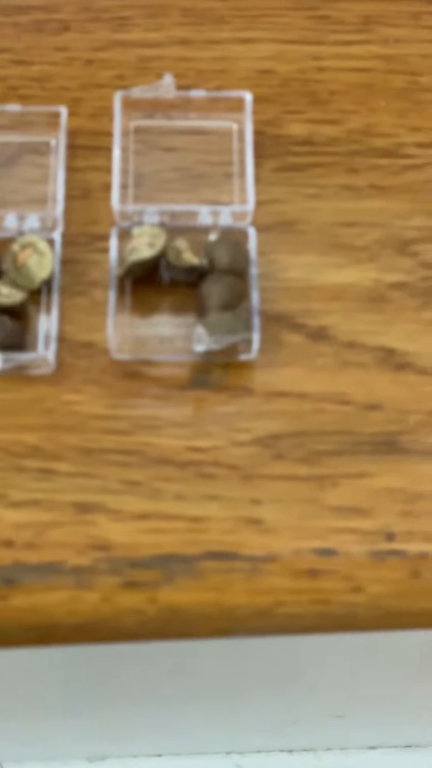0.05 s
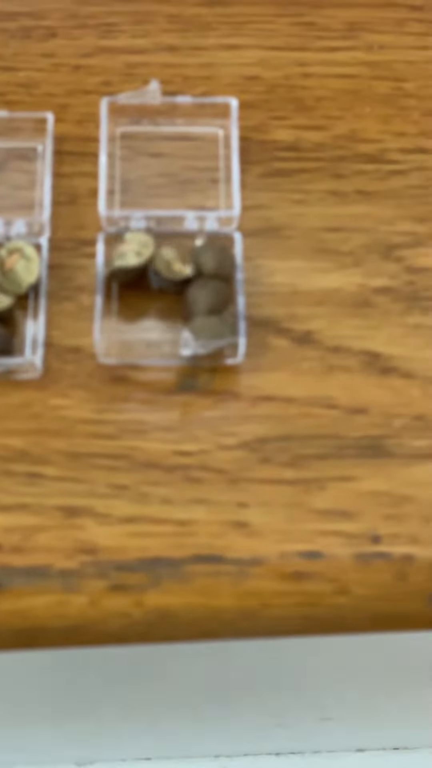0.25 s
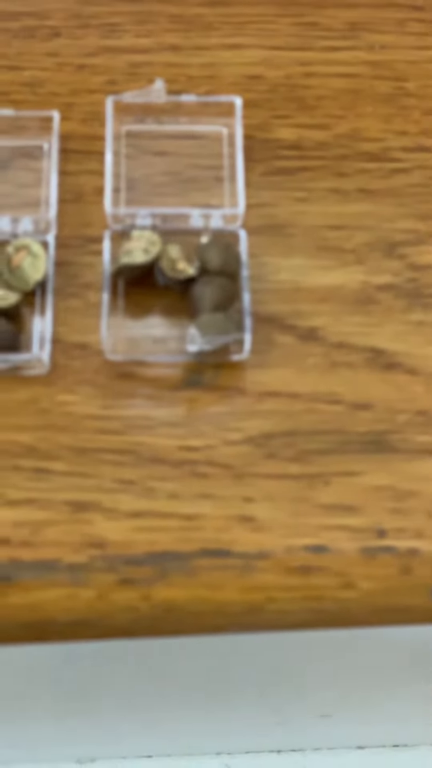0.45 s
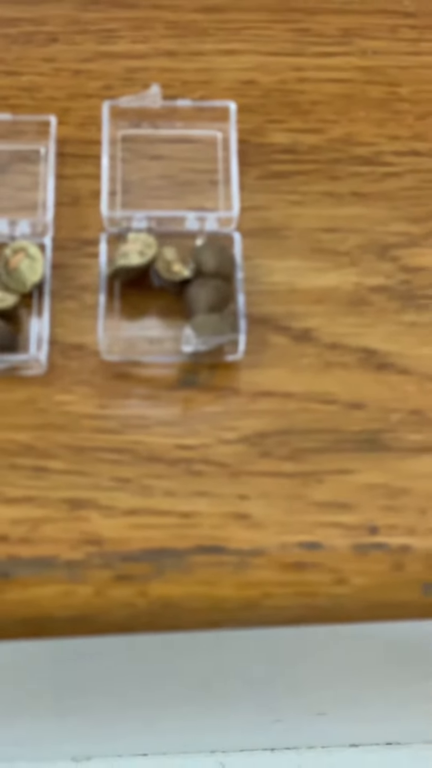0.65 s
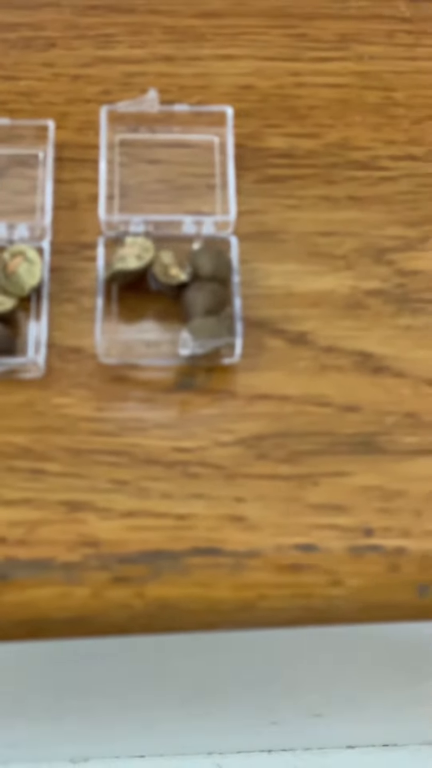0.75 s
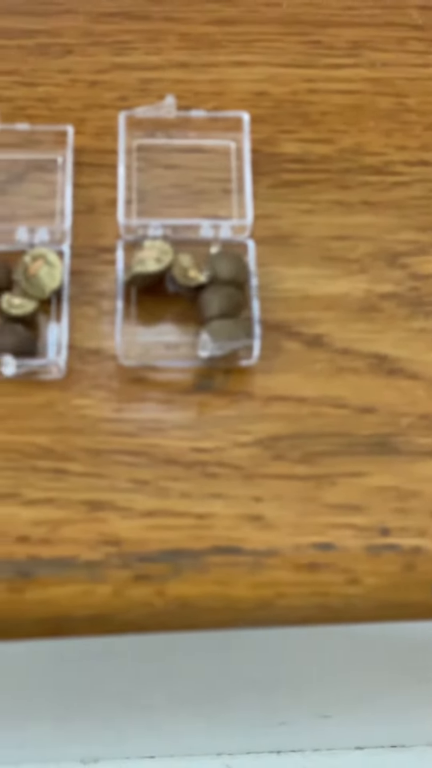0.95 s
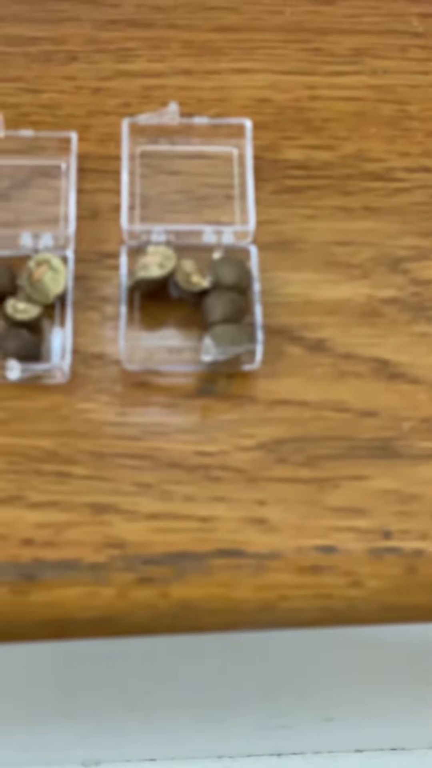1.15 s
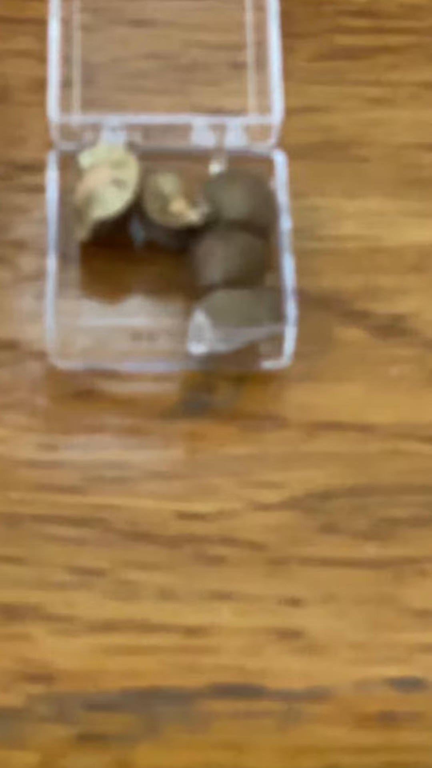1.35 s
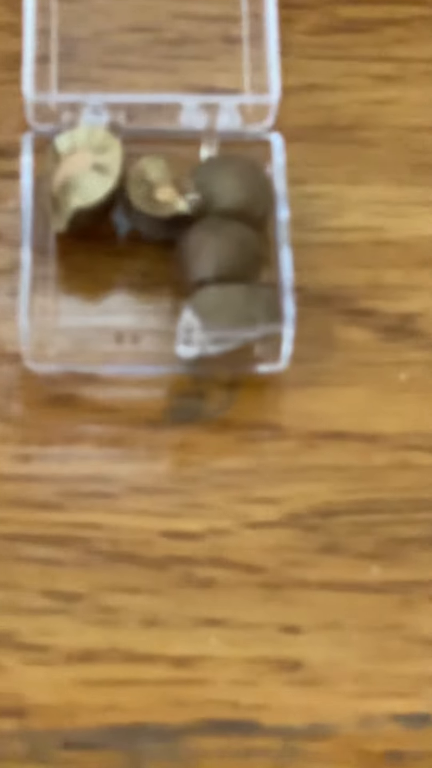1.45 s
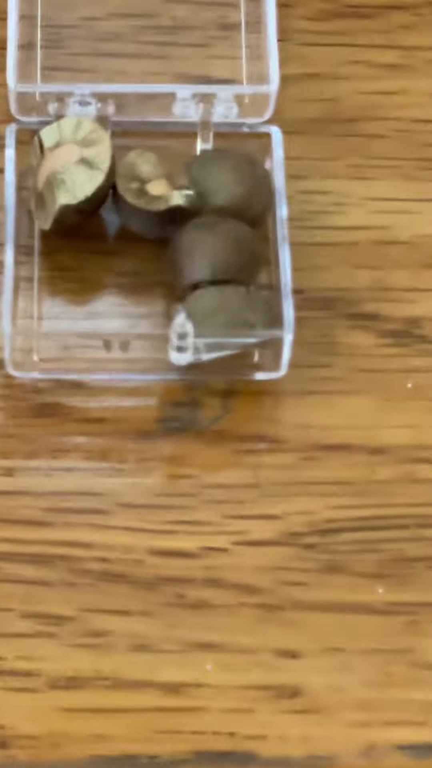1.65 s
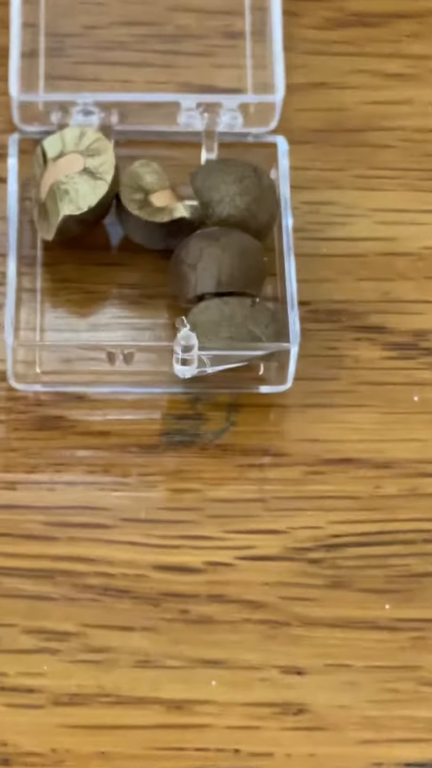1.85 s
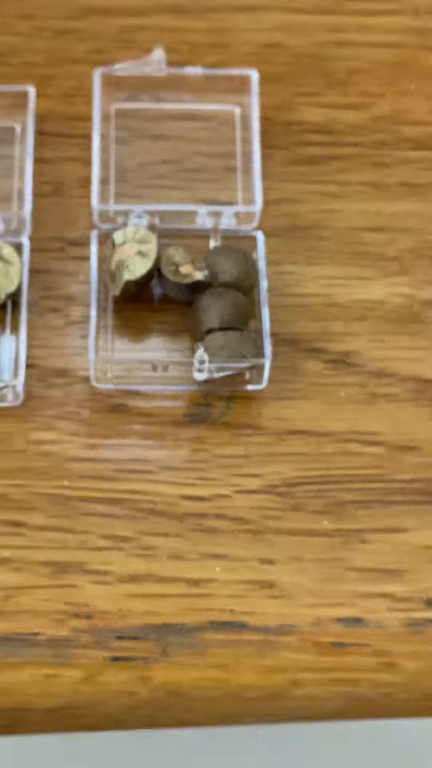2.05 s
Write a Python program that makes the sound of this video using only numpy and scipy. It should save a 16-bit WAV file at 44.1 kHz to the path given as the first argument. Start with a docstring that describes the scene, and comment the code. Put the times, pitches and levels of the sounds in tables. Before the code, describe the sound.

Small plastic cases click close by, with a bright, brittle, bouncing run at about 0.2 seconds. A faint knock sounds further off near 0.65 seconds. More clicks come around 0.9 seconds, then a soft tap on a wooden table at 1.05 and a last sharp cluster at 1.2. Faint taps and knocks continue until about 2 seconds, over low room rumble and a slight hum.

```python
"""A quiet room with a wooden table, where small hard plastic cases are handled. Each impact excites the
modes of a case: bright, brittle clicks in short bouncing runs. Soft taps ring the table near 700 Hz,
and a few softer knocks sound further off, over low rumble, a hum and a faint hiss.
Two close microphone ports hear nearly the same sound, with a phase gap that grows in the treble."""
import sys
import numpy as np
from scipy import signal
from scipy.fft import rfft, irfft
from scipy.io import wavfile

SR = 44100
rng = np.random.default_rng(int(sys.argv[2]) if len(sys.argv) > 2 else 0)


def persist_wave(psi):
    """Save psi, clipped to +-1, as 16-bit WAV."""
    counts = np.round(np.clip(psi, -1, 1) * 32767).astype(np.int16)
    wavfile.write(sys.argv[1], SR, np.atleast_2d(counts).T)


N = 92610
OPPOSITE = np.array([[1], [-1]])  # antiphase at the left and right ports


def amp(db):
    """Decibels as an amplitude ratio."""
    return 10 ** (np.asarray(db) / 20)


def unit(x):
    """Normalisation to rms 1."""
    return x / np.sqrt(np.mean(x ** 2) + 1e-20)


def decay(t, t60):
    """Exponential damping: 60 dB down after t60 seconds."""
    return amp(-60 * t / t60)


def envelope(rows):
    """Amplitude at every sample, interpolated in decibels."""
    return amp(np.interp(np.arange(N) / SR, *np.transpose(rows)))


def drift(rate):
    """Slow random modulation: low-passed noise with a spread near 1."""
    r = np.exp(-80 * np.pi * rate / SR)
    slow = signal.lfilter([1], [1, -2 * r, r * r], rng.standard_normal(N // 40 + 2002))[2000:]
    return np.interp(np.arange(N) / 40, np.arange(len(slow)), unit(slow))


def ring(x, hz, t60):
    """Damped resonator: a unit impulse starts a decaying sine of height 1."""
    r, w = decay(1 / SR, t60), 2 * np.pi * hz / SR
    return signal.lfilter([0, np.sin(w)], [1, -2 * r * np.cos(w), r * r], x + 1e-18)


def burst(grain, decay_s):
    """Noise transient of unit energy: a quick rise, then exponential decay."""
    t = np.arange(len(grain)) / SR
    shape = grain * np.exp(-t / decay_s) * t / (t + decay_s / 2)
    return shape / np.sqrt(np.sum(shape ** 2))


def absorb(x, cutoff_hz=13500):
    """Absorption: air and soft furnishings take the highest treble."""
    return signal.sosfilt(signal.butter(6, cutoff_hz, fs=SR, output="sos"), x)


def noise(spectrum, flicker_db):
    """Amplitude-modulated noise of rms 1: each half-octave band flickers on its own, the treble less."""
    hz, db = np.transpose(spectrum)
    f = np.arange(N // 2 + 1) * SR / N + 1
    shaped = rfft(rng.standard_normal(N)) * amp(np.interp(np.log(f), np.log(hz), db))
    half_octaves = 2 * np.log2(f / 20)
    bands = (irfft(shaped * np.clip(1 - abs(half_octaves - k), 0, 1) ** .5, N) for k in range(21))
    return unit(sum(band * amp(flicker_db * (1 - k / 24) * drift(6.0)) for k, band in enumerate(bands)))


def room_noise():
    """Partial coherence: a rumble common to both ports, plus weaker noise in antiphase."""
    # spectrum of the common noise: (frequency [Hz], relative density [dB])
    common = [(26, -35.5), (35, -7.5), (40, 0), (100, -1.5), (210, -10), (330, -20), (500, -30),
              (1100, -27.5), (1700, -40), (2600, -49.5), (4800, -55), (6200, -50.5), (8500, -57.5),
              (11500, -51), (14000, -64.5), (16000, -84)]
    # spectrum of the antiphase noise: (frequency [Hz], relative density [dB])
    antiphase = [(60, -5), (150, 9), (250, 12), (500, 12.5), (1200, 11.5), (2000, -22.5), (5000, -21),
                 (8000, -41.5), (14000, -50.5)]
    return amp(-53) * noise(common, flicker_db=5) + amp(-72) * noise(antiphase, flicker_db=8) * OPPOSITE


def hum(hz=177.8):
    """A pure tone under slow amplitude modulation: the level dips and recovers."""
    # course of the hum: (time [s], rms level [dB])
    levels = [(0.0, -58), (0.72, -75), (0.81, -57), (1.06, -61.5), (1.6, -59.5), (1.84, -80.5), (1.89, -65),
              (2.06, -59), (2.1, -83)]
    return envelope(levels) * np.sqrt(2) * np.sin(2 * np.pi * hz * np.arange(N) / SR)


def case_clicks():
    """Modal vibration: impacts ring the plastic. Returns the clicks and their first broad cracks."""
    # impacts: (time [s], level of each of six mode groups from low to high [dB], contact time [s])
    impacts = [(0.188, -55, -66, -61, -58.5, -61, -60.5, 0.0018),
               (0.2015, -58.5, -67, -67.5, -73, -66, -70.5, 0.0073),
               (0.2205, -45.5, -39, -49, -50, -51, -58.5, 0.0026),
               (0.2286, -28, -17.5, -23, -19, -10, -28, 0.0002),
               (0.2355, -39, -37, -44.5, -40, -35.5, -45.5, 0.00033),
               (0.2437, -34, -21, -39, -27.5, -34.5, -46, 0.0002),
               (0.2598, -45.5, -37, -42.5, -34.5, -40, -48.5, 0.00067),
               (0.287, -60.5, -47, -64, -52.5, -52, -70, 0.0002),
               (0.8516, -30.5, -31.5, -31, -31.5, -27, -29, 0.0002),
               (0.864, -35, -33, -42, -33.5, -47, -61, 0.0002),
               (0.877, -47.5, -55, -54, -58, -61.5, -59, 0.0018),
               (0.8878, -40, -28, -25.5, -21, -23, -30, 0.0002),
               (0.9172, -40.5, -25.5, -30, -45, -50, -38.5, 0.0002),
               (0.934, -53.5, -60, -49, -62, -59.5, -65.5, 0.0002),
               (0.943, -58.5, -64, -68, -54.5, -58.5, -61.5, 0.002),
               (0.9672, -51, -42, -54.5, -48.5, -51.5, -69, 0.00033),
               (1.1805, -50, -47, -52.5, -61, -51.5, -61.5, 0.00067),
               (1.1868, -29, -22.5, -25, -21, -9.5, -26.5, 0.0002),
               (1.1976, -47, -27.5, -29, -32, -34, -40.5, 0.0002),
               (1.2062, -34, -23, -29.5, -21.5, -28, -42, 0.0002),
               (1.234, -52, -56, -49.5, -55, -56, -64.5, 0.0002),
               (1.2455, -75, -62, -50, -55, -63, -66, 0.00033)]
    # modes of a case: (frequency [Hz], relative level [dB], t60 [s])
    modes = [(2926, -6, 0.0045), (3570, -3.5, 0.0033), (4248, -8, .016), (4674, -6, 0.0096),
             (5538, -8, 0.0093), (6077, 1, 0.0064), (6450, -5.5, 0.0096), (7736, -5, .025),
             (8406, -6, 0.012), (9200, -6, .015), (10850, -8, .015), (12600, -10, 0.018), (13200, -4, .011),
             (15000, -11.5, 0.0043)]
    # borders between the mode groups: (frequency [Hz])
    group_edges = [5100, 7000, 8700, 10000, 11500]
    gain_db, spread_db, detune_spread, rise_s = 2, 0.5, 0.013, .0003
    length, grains = 4410, 800  # samples
    t = np.arange(length) / SR
    onset = decay(t, t60=0.036)
    rise = 1 - np.exp(-(t / rise_s) ** 2)
    clicks, cracks = np.zeros((2, N + length))
    draws = rng.standard_normal((len(impacts), grains + 3 * len(modes)))
    for (s, *group_db, contact_s), draw in zip(impacts, draws):
        # a contact under half a millisecond is a clean blow, a longer one a scuff
        force = 2 * burst(draw[:grains], contact_s) if contact_s > .0005 else [1.]
        force = np.pad(force, (0, length))[:length]
        # each impact strikes every mode a little differently
        for (hz, mode_db, t60), (loud, detune, polarity) in zip(modes, draw[grains:].reshape(-1, 3)):
            level = amp(gain_db + group_db[np.searchsorted(group_edges, hz)] + mode_db + spread_db * loud)
            partial = np.sign(polarity) * level * rise * ring(force, hz * (1 + detune_spread * detune), t60)
            clicks[int(s * SR):][:length] += partial
            cracks[int(s * SR):][:length] += partial * onset
    low_cut = signal.butter(3, 1850, "high", fs=SR, output="sos")
    clicks, cracks = signal.sosfilt(low_cut, [clicks, cracks])
    # early reflections from close surfaces smear the ring, not alike on both sides
    reflections = [burst(grain, decay_s=.0025) for grain in rng.standard_normal((2, 1500))]
    common, apart = (signal.fftconvolve(clicks, response)[:N] for response in reflections)
    return clicks[:N] + amp(-10) * common + amp(-12) * apart * OPPOSITE, cracks[:N]


def far_knocks():
    """Forced resonance: a grainy scuff drives one heavily damped mode, with a faint hissy tick."""
    # knocks: (time [s], scuff level [dB], frequency [Hz], t60 [s], tick level [dB])
    knocks = [(.190, -48, 2500, .004, -73), (.646, -45, 2100, 0.0044, -52.5),
              (0.648, -55, 1210, 0.0088, -89), (.762, -65, 5300, 0.0085, -80),
              (0.765, -49, 1300, 0.0016, -93.5), (0.828, -51, 990, 0.0055, -65),
              (1.058, -62.5, 2364, .004, -84.5), (1.882, -56, 1730, .018, -59),
              (1.882, -55, 1250, 0.016, -83), (2.026, -71, 4190, .012, -80.5)]
    length = 1600
    draws = rng.standard_normal((len(knocks), 2, length))
    out = np.zeros(N + length)
    for (s, db, hz, t60, tick_db), (scuff_grain, tick_grain) in zip(knocks, draws):
        scuff = 2 * amp(db) * ring(burst(scuff_grain, decay_s=0.009), hz, t60)
        tick = 10 * amp(tick_db) * np.gradient(burst(tick_grain, decay_s=.003))
        out[int(s * SR):][:length] += scuff + tick
    return absorb(out[:N])


def hiss(band_hz=(6900, 14400)):
    """Band-limited noise: a faint high hiss that swells once."""
    # course of the hiss: (time [s], rms level [dB])
    levels = [(0, -100), (.3, -100), (.42, -80.5), (.72, -95.5), (.8, -100), (2.1, -100)]
    band = signal.butter(4, band_hz, "band", fs=SR, output="sos")
    return envelope(levels) * unit(signal.sosfilt(band, rng.standard_normal(N)))


def table_taps():
    """Soft contact carries little treble: taps and a faint random patter ring the wood's low modes."""
    # taps on the table: (time [s], level [dB])
    taps = [(1.0566, -40.5), (1.0581, -34.5), (1.0611, -34.5), (1.0639, -26), (1.0815, -59), (1.1005, -52),
            (1.369, -44.5), (1.506, -40.5), (1.609, -49), (1.778, -48), (1.877, -48.5), (1.949, -45),
            (1.984, -38), (2.011, -49), (2.052, -55)]
    # modes of the table: (frequency [Hz], relative level [dB], t60 [s])
    modes = [(170, -11.5, 0.013), (350, -15.5, 0.049), (549, -4, 0.025), (695.4, 3, 0.026),
             (1134, -38, .015), (1560, -40, 0.01)]
    tap_gain_db, patter_per_s, patter_db, softness_hz = -3.5, 75, -71.5, 1400
    s, db = np.transpose(taps)
    blows = np.zeros(N)
    np.add.at(blows, (s * SR).astype(int), amp(db + tap_gain_db))
    patter = (rng.random(N) < patter_per_s / SR) * amp(patter_db + 2.5 * rng.standard_normal(N))
    soft = signal.butter(4, softness_hz, fs=SR, output="sos")
    force = signal.sosfilt(np.vstack([soft, soft]), blows + patter + 1e-18)
    return sum(amp(mode_db) * ring(force, hz, t60) for hz, mode_db, t60 in modes)


def reverberation(x, delay_s=0.0031, split_hz=7000):
    """Convolution with a decaying noise tail, mostly common to both ports; the treble dies sooner."""
    t = np.arange(SR) / SR
    common, apart = rng.standard_normal((2, SR))
    build_up = np.clip(t / delay_s - 1, 0, 1)
    white = (common + .12 * apart * OPPOSITE) * build_up
    dull = signal.sosfiltfilt(signal.butter(2, split_hz, fs=SR, output="sos"), white)
    tail = dull * decay(t, t60=0.43) + amp(-1) * (white - dull) * decay(t, t60=0.33)
    tail /= np.sqrt(np.sum(tail[0] ** 2))
    return signal.fftconvolve(absorb(x)[None], tail, axes=1)[:, :N]


def scene():
    """Superposition of direct sound, reverberation and background; far knocks are the most reverberant."""
    clicks, cracks = case_clicks()
    taps, knocks = table_taps(), far_knocks()
    into_room = amp(-30) * clicks.mean(0) + amp(-20) * cracks + amp(-23) * taps + amp(-5) * knocks
    return clicks + taps + knocks + reverberation(into_room) + hiss() + hum() + room_noise()


def record(dry):
    """Interchannel phase: each port takes half of the phase gap, then a steep low-pass cuts the top."""
    # lead of the left port over the right: (frequency [Hz], phase [rad])
    phase_gap = [(0, 0), (2000, .1), (4400, .4), (4850, 1.6), (5150, .1), (6200, .7), (7600, 1.8),
                 (9200, 3.1), (11300, 3.2), (13800, 6.0), (16500, 6.3)]
    lead = np.interp(np.arange(N // 2 + 1) * SR / N, *np.transpose(phase_gap))
    ports = irfft(rfft(dry) * np.exp(.5j * lead * OPPOSITE), N)
    return signal.sosfilt(signal.cheby2(12, 70, 16950, fs=SR, output="sos"), ports)


dry = scene()
out = record(dry)
persist_wave(out)
```